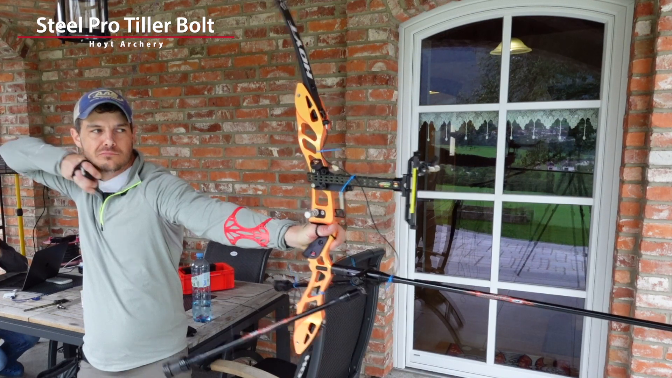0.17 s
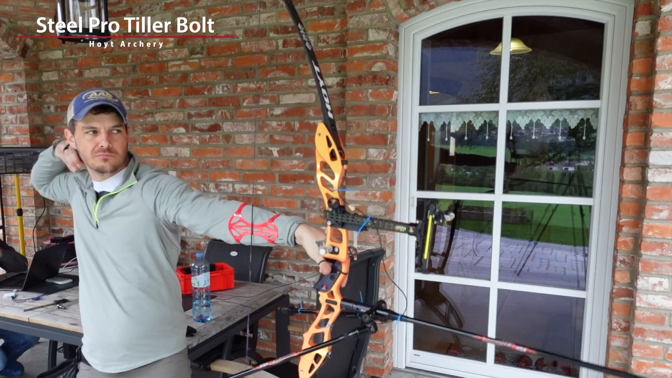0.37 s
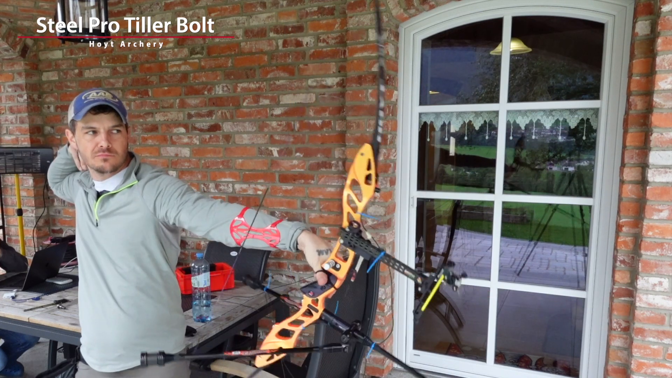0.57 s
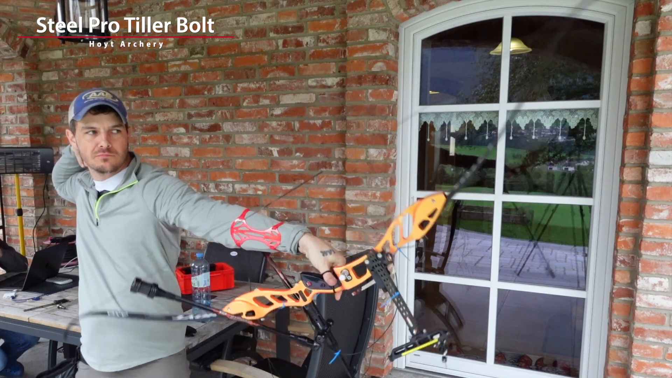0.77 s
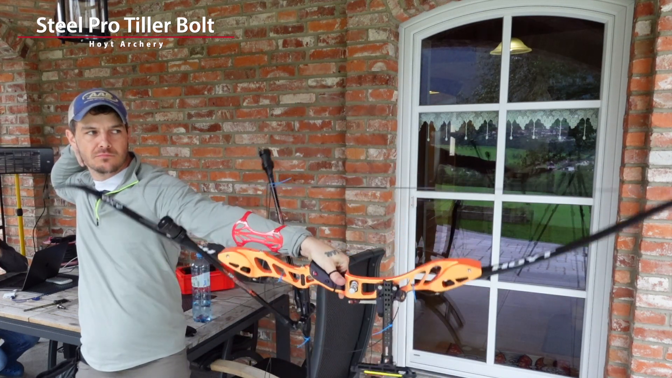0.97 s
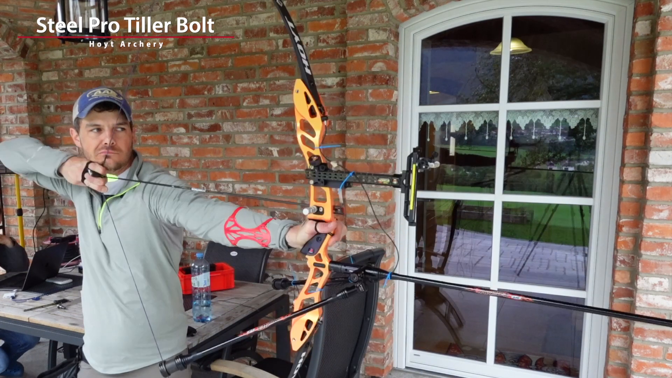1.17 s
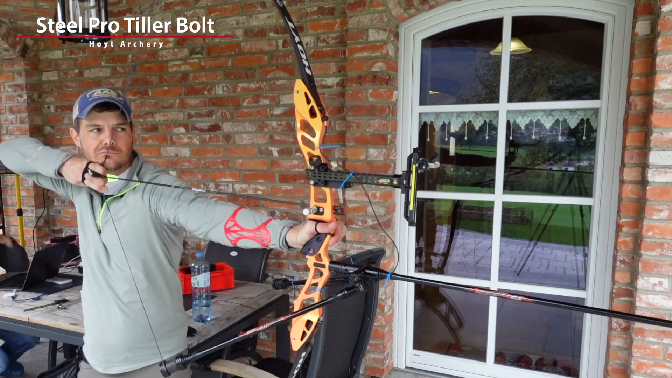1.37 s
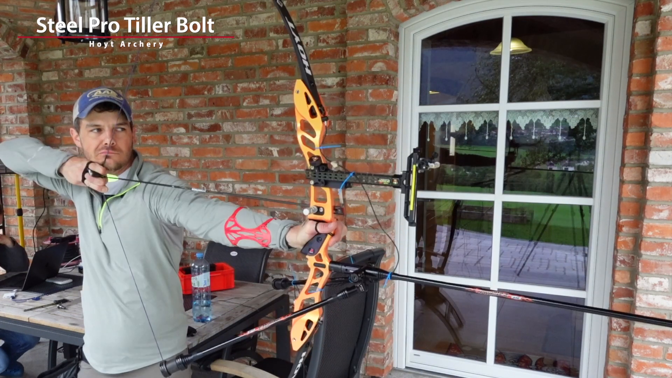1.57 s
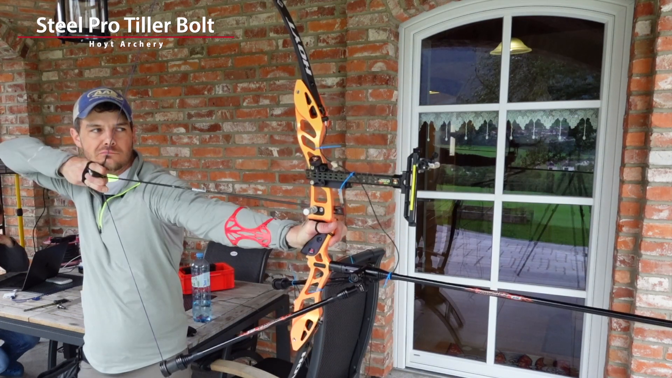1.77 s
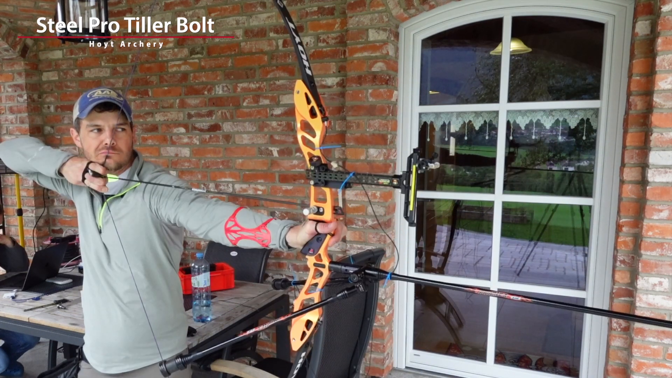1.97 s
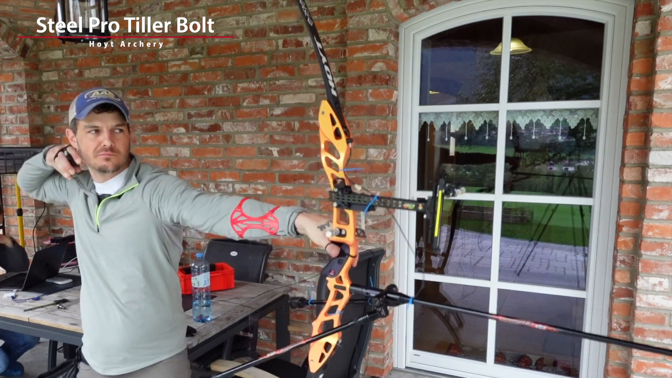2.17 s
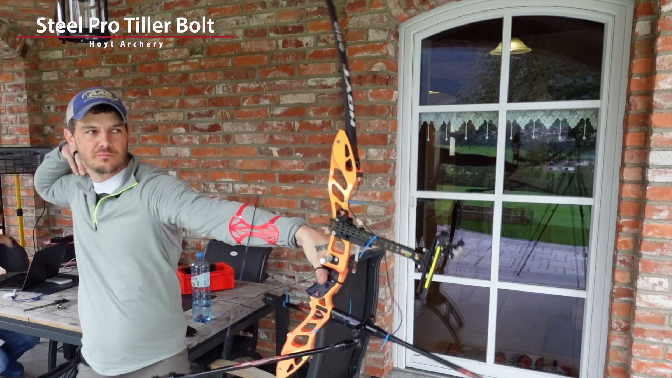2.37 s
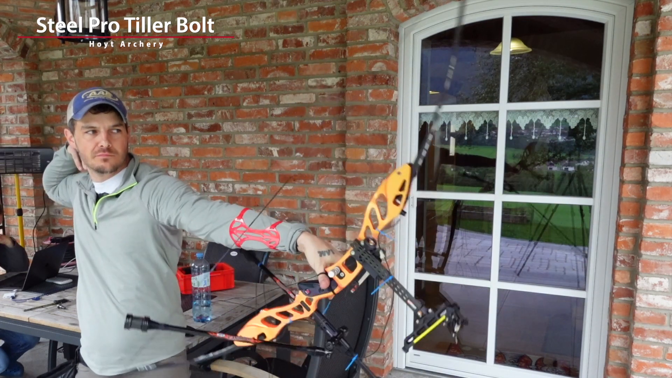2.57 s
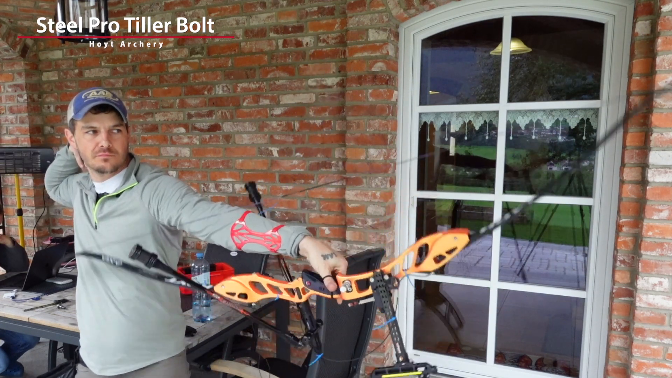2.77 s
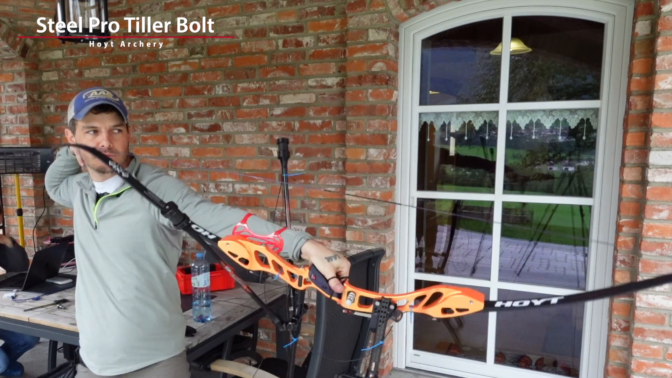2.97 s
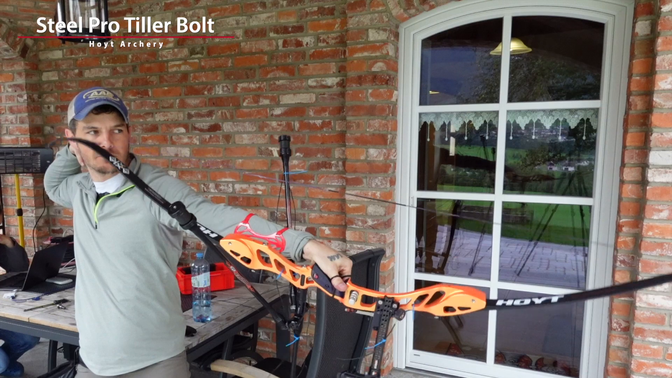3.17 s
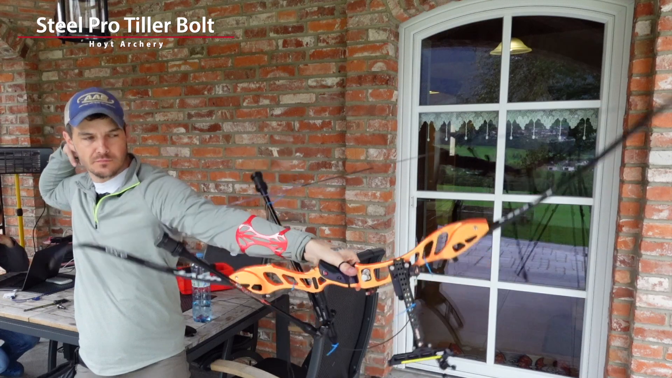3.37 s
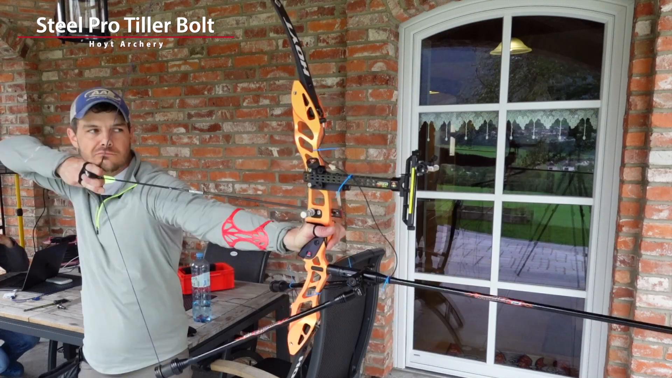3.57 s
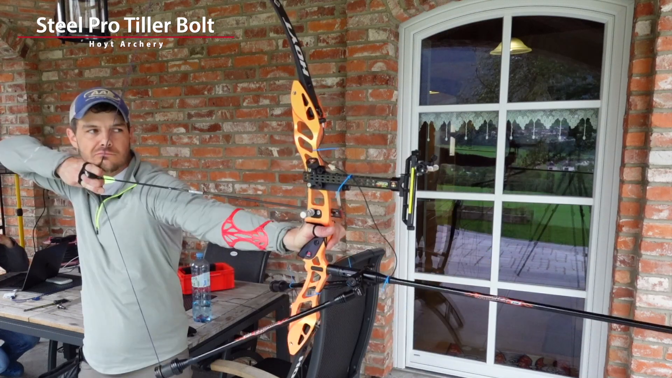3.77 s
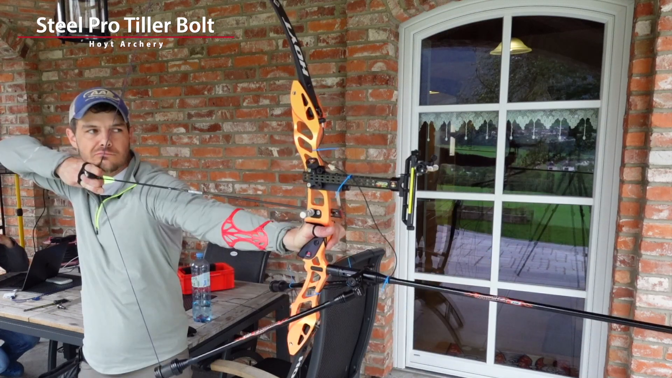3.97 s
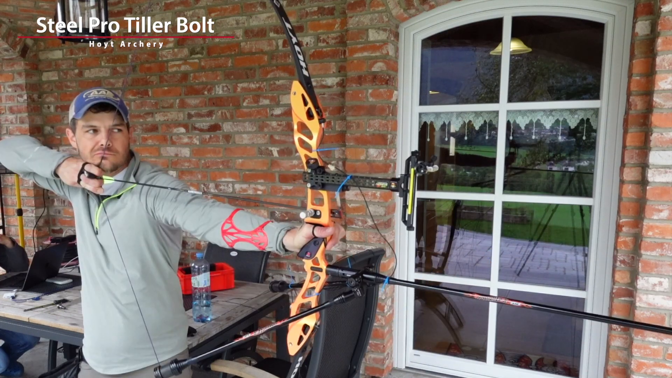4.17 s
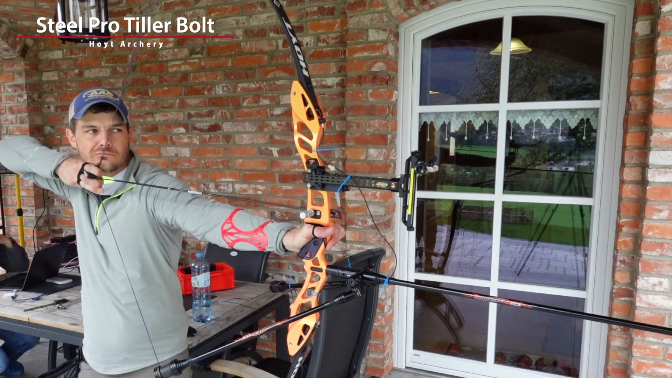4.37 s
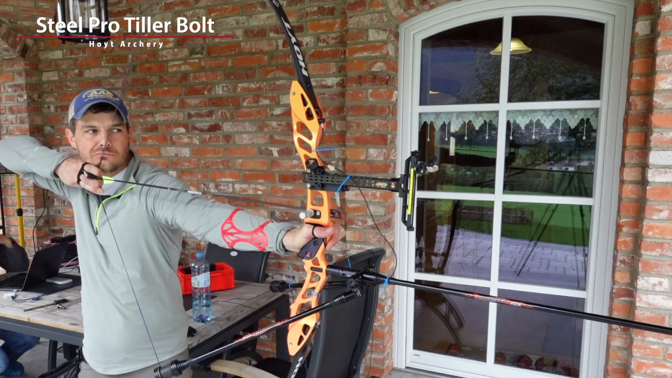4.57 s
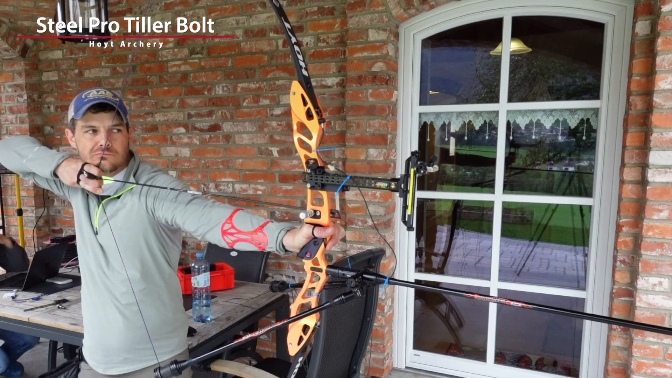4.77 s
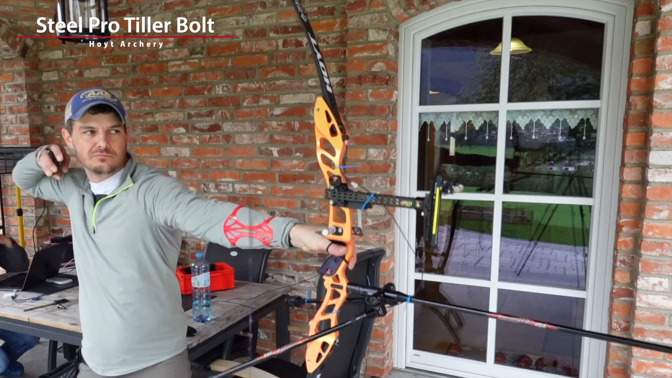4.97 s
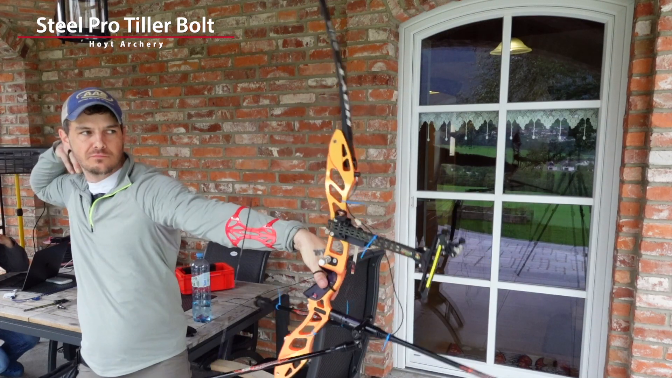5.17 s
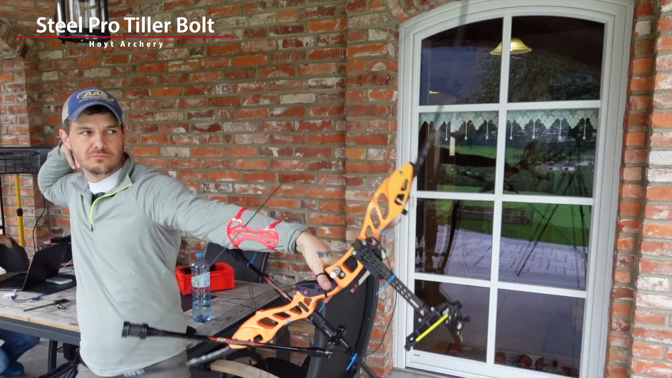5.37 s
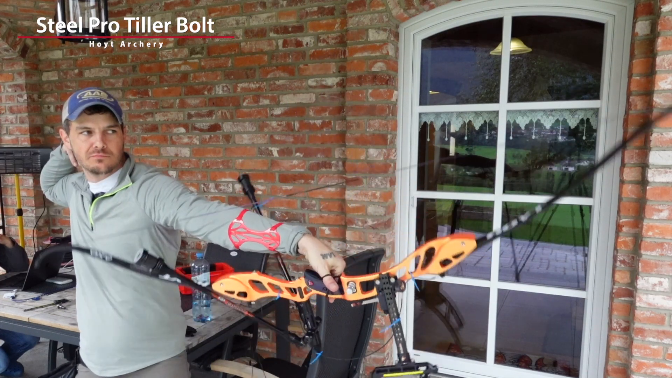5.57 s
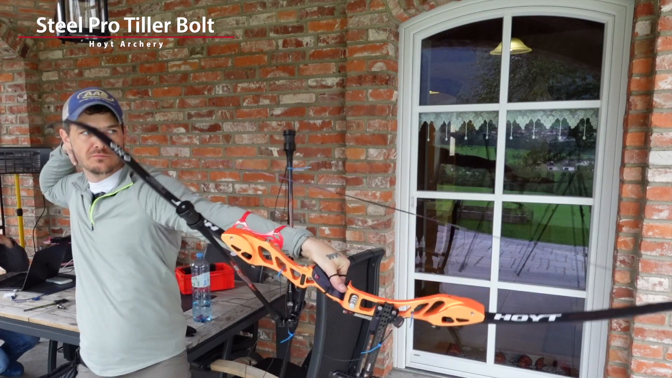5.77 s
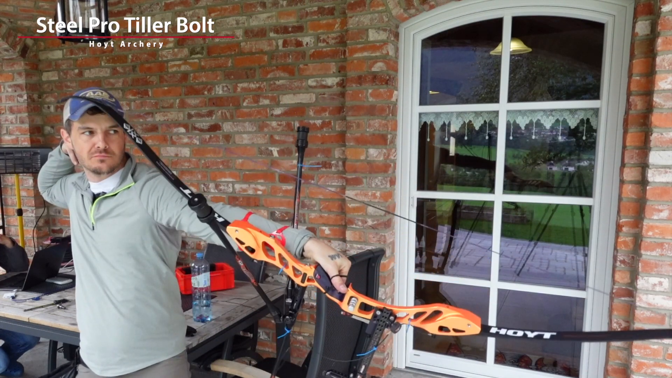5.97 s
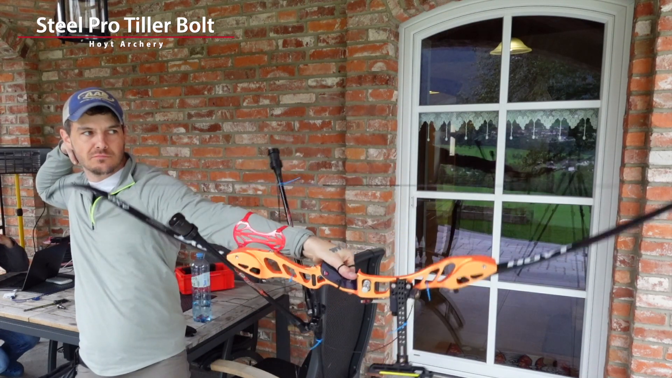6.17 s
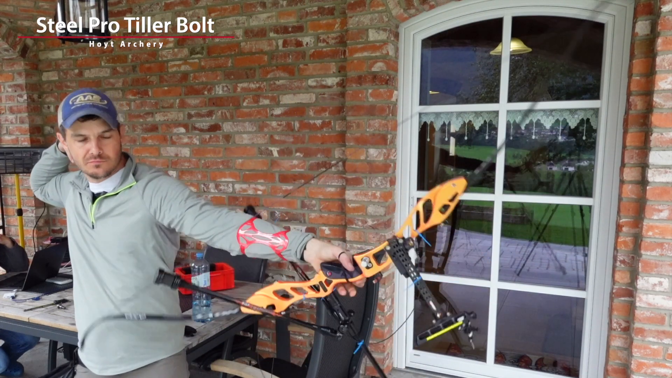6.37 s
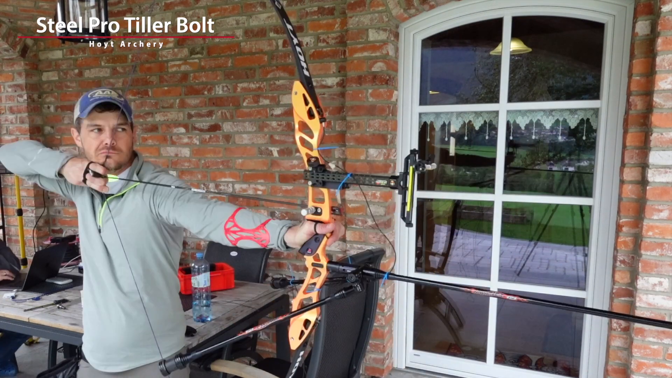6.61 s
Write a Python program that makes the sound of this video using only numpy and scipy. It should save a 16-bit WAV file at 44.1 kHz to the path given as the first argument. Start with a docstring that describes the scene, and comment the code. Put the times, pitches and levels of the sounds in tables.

```python
"""A sharp click, then the zip, slap and twang of a recurve bow and a far thud: three shots on a porch.
Each time the clicker snaps off the arrow point, the string slips from the fingers, the arrow zips past
its rest, string and limbs slam to a stop and ring, and the arrow hits a target some way off.
Fittings tick as the bow swings. Brick walls throw the sound back; under it lie outdoor air and,
after the first shot, a light breeze that dies away."""
import sys
import numpy as np
from scipy import signal
from scipy.fft import rfft, irfft
from scipy.io import wavfile
from scipy.ndimage import uniform_filter1d

SR = 44100
rng = np.random.default_rng(int(sys.argv[2]) if len(sys.argv) > 2 else 0)


def waveform_to_disk(signal):
    """Save audio, clipped to [-1, 1], as 16-bit WAV at the path in sys.argv[1]."""
    frames = np.transpose(np.atleast_2d(signal))
    scaled = np.clip(frames, -1, 1) * 32767
    samples = np.round(scaled).astype(np.int16)
    wavfile.write(sys.argv[1], SR, samples)


N = 292824
T = np.arange(int(.8 * SR)) / SR   # seconds within one event

# The shots. Each row: when the string stops in seconds, bow level in dB, finger slip in dB,
# arrow zip in dB, flight time in seconds, target thud in dB, buzz of the fittings in dB.
SHOTS = [(0.2062, -1, -23.5, 0, 0.18, -0.5, -74), (2.0847, 0, -17.5, -2.5, 0.18, 0.5, -52.5),
         (4.9017, 0, -13, -3.5, 0.194, -3, -50.5)]
# Modes of string and limbs; the loudest is the string's swing.
# Each row: frequency in Hz, level in dB, time to fall 60 dB (t60) in seconds.
BOW_MODES = [(83, -23, 0.25), (116.5, -28.5, 0.65), (143.4, -27, 0.4), (197.4, -8, 0.36),
             (223.8, -13.5, 0.3), (233.3, -20, 0.57), (270, -26.5, .3), (392, -16, 0.35),
             (472.3, -24, 0.56), (512, -17, 0.34), (568, -22, 0.44), (890, -18, 0.21), (916, -27, 0.52),
             (956, -26, .27), (1367, -31.5, 0.31)]


def from_db(db):
    """Decibels to gain."""
    return 10 ** (np.asarray(db) / 20)


def rms_one(x):
    """Scale to unit power."""
    return x / np.sqrt(np.mean(x ** 2) + 1e-20)


def at_hz(points, hz):
    """Read a curve on a log-frequency axis."""
    f, value = np.transpose(points)
    return np.interp(np.log(np.maximum(hz, 1)), np.log(f), value)


def fade(t60):
    """Exponential decay that falls 60 dB in t60 seconds."""
    return np.exp(-np.log(1000) * T / t60)


def hold_and_fall(hold_s, early_t60, late_db, late_t60):
    """A level that holds for a moment, then falls quickly into a slow faint tail."""
    return from_db(-60 * np.maximum(T - hold_s, 0) / early_t60) + from_db(late_db) * fade(late_t60)


def add(out, s, sound):
    """Mix a sound in at s seconds."""
    at = max(round(s * SR), 0)
    out[at:at + len(sound)] += sound[:N - at]


def through(x, response):
    """Causal convolution that keeps the length."""
    return signal.fftconvolve(x, response)[:len(x)]


def colour(x, spectrum, size=16384):
    """Minimum-phase EQ through (Hz, dB) points: nothing sounds ahead of the attack."""
    gain = from_db(at_hz(spectrum, np.fft.rfftfreq(size, 1 / SR)))
    cepstrum = irfft(np.log(gain))
    cepstrum[1:size // 2] *= 2
    cepstrum[size // 2 + 1:] = 0
    return through(x, irfft(np.exp(rfft(cepstrum))))


def ring(modes):
    """Decaying sines of a struck body."""
    return sum(from_db(db) * fade(t60) * np.sin(2 * np.pi * hz * T) for hz, db, t60 in modes)


def contacts(per_s, spread_db):
    """Random tiny impacts of uneven size, at unit power."""
    sizes = from_db(spread_db * np.clip(rng.standard_normal(len(T)), -2, 2))
    signs = rng.choice([-1, 1], len(T))
    hits = rng.random(len(T)) < per_s / SR
    return rms_one(sizes * signs * hits)


def porch_tail(build_s=0.0046):
    """Diffuse reflections that build up and die soonest in the high treble; unit energy."""
    # Porch reverb. Each row: band centre in Hz, t60 in seconds.
    decays = [(100, 0.428), (400, 0.18), (1000, 0.33), (2500, 0.31), (5000, 0.28), (9000, 0.19),
              (15000, 0.097)]
    white = rfft(rng.standard_normal(len(T)))
    hz = np.fft.rfftfreq(len(T), 1 / SR)
    centres, t60s = np.transpose(decays)
    tail = np.zeros(len(T))
    for share, t60 in zip(np.eye(len(centres)), t60s):
        band = at_hz(list(zip(centres, share)), hz)
        tail += irfft(white * band, len(T)) * fade(t60)
    tail *= 1 - np.exp(-(T / build_s) ** 2)
    return tail / np.linalg.norm(tail)


def porch(x, direct_db, echo_db, tail_db, echo_s=.01085):
    """Direct sound, one hard slapback off the brick wall and a fresh diffuse tail for each source."""
    echo = np.interp(np.arange(N) - round(echo_s * SR), np.arange(N), x, left=0)
    return from_db(direct_db) * x + from_db(echo_db) * echo + from_db(tail_db) * through(x, porch_tail())


def outdoor_air():
    """A bed of low outdoor noise and hiss whose level and brightness change in steps."""
    # The steps. Each row: start in seconds, level in dB, hiss relative to that level in dB.
    steps = [(0, -49, -14), (1.204, -57, -40), (3.534, -53.5, -11)]
    # Tone of the air. Each row: frequency in Hz, gain in dB.
    air_eq = [(15, -31.5), (25, 0), (59, -9), (102, -6), (130, -6), (242, -10), (293, -10.5), (439, -10.5),
              (489, -10), (607, -10.5), (1610, -17), (7110, -23), (14000, -41), (16000, -41)]
    hiss_eq = [(1000, -30.5), (4000, 3), (7000, 7.0), (12000, -12.0)]
    starts, level_db, hiss_db = np.transpose(steps)
    step = np.maximum(np.searchsorted(starts, np.arange(N) / SR, "right") - 1, 0)
    air = rms_one(colour(rng.standard_normal(N), air_eq))
    hiss = rms_one(colour(rng.standard_normal(N), hiss_eq))
    return from_db(level_db[step]) * (air + from_db(hiss_db[step]) * hiss)


def clicker(crack_db=-4.5, crack_t60=0.017):
    """A steel blade chatters against the riser; its brief ring is heard mostly off the walls."""
    # Blade strikes. Each row: start in seconds, level in dB.
    strikes = [(0.031, -2), (1.9120, -2.5), (4.7298, -2.5)]
    # Ring of the blade. Each row: frequency in Hz, level in dB, t60 in seconds.
    blade_modes = [(1620, -35.5, .022), (1688, -24, 0.058), (2420, -36.5, 0.013), (3130, -34, .015),
                   (3920, -26.5, 0.02), (5070, -29, .025), (5010, -25.5, .045), (5600, -30, 0.017),
                   (7800, -28.5, 0.015), (10200, -31, .02)]
    # Tone of the crack. Each row: frequency in Hz, gain in dB.
    crack_eq = [(200, -27.5), (500, -21), (900, -23), (1500, -9), (3000, -9.5), (5000, -3.5), (8000, -8.5),
                (10000, -1.5), (11000, -10.5), (13500, -2.5), (16000, -9.5)]
    crack, blade = np.zeros((2, N))
    for s, db in strikes:
        chatter = contacts(per_s=30000, spread_db=0.94) * fade(crack_t60)
        add(crack, s, from_db(db + crack_db) * colour(chatter, crack_eq))
        add(blade, s, from_db(db) * ring(blade_modes))
    return (porch(crack, direct_db=-1.5, echo_db=-5.0, tail_db=0.5)
            + porch(blade, direct_db=-14.0, echo_db=-4.5, tail_db=-1.0))


def string_release(slip_lead_s=0.014, zip_lead_s=.0098, slip_rise_s=.002):
    """The string scrapes off the finger tab and drives the arrow out."""
    # Tone of the scrape. Each row: frequency in Hz, gain in dB.
    slip_eq = [(100, -9.5), (500, -0.5), (2000, -1.5), (5500, 3), (9000, -1.5), (15000, -10.5)]
    out = np.zeros(N)
    envelope = fade(t60=0.051) * (1 - np.exp(-(T / slip_rise_s) ** 2))
    for s, _, slip_db, zip_db, *_ in SHOTS:
        scrape = contacts(per_s=12000, spread_db=3) * envelope
        add(out, s - slip_lead_s, from_db(slip_db) * colour(scrape, slip_eq))
        add(out, s - zip_lead_s, from_db(zip_db) * arrow_zip())
    return out


def arrow_zip(start_hz=1900, end_hz=4900, stroke_s=.0085, rise_db=26.0, rough=.28, leave_s=0.002):
    """The shaft rubs unevenly over its rest, rising in pitch and level as it gathers speed."""
    travel = np.minimum(T / stroke_s, 1)
    wobble, grip = rms_one(uniform_filter1d(rng.standard_normal((2, len(T))), size=14))
    hz = (start_hz + (end_hz - start_hz) * travel ** 1.5) * (1 + .5 * rough * wobble)
    leaving = np.exp(-(np.maximum(T - stroke_s, 0) / leave_s) ** 2)
    envelope = from_db(rise_db * (travel - 1)) * leaving * (1 + rough * grip)
    return envelope * np.sin(2 * np.pi * np.cumsum(hz) / SR)


def twang(kick_db=-5.0, kick_hz=215, kick_t60=.04, kick_rise_s=0.0019, swell_s=.009, lead_s=.001):
    """The string jerks taut with a low kick while the modes of string and limbs swell and ring."""
    out = np.zeros(N)
    kick = ring([(kick_hz, kick_db, kick_t60)]) * (1 - np.exp(-T / kick_rise_s))
    body = ring(BOW_MODES) * (1 - np.exp(-T / swell_s))
    for s, db, *_ in SHOTS:
        add(out, s - lead_s, from_db(db) * (kick + body))
    return out


def limb_slap(throb=0.46, slap_lag_s=.0075, slap_t60=.025, rattle_db=-7.5):
    """The string slaps the limbs hard on its first rebound, then more lightly on every swing."""
    # Tone of string on limb. Each row: frequency in Hz, gain in dB.
    slap_eq = [(400, -33), (900, -15), (1500, -10), (3000, -8.5), (4300, -8.5), (5600, -6), (7000, -11.5),
               (8500, -8.5), (10500, -15.5), (13000, -14), (16000, -21.5)]
    out = np.zeros(N)
    string_hz = max(BOW_MODES, key=lambda mode: mode[1])[0]
    swing = 1 + throb * np.cos(2 * np.pi * string_hz * (T - .003))
    force = swing * hold_and_fall(hold_s=0.034, early_t60=0.15, late_db=-39.0, late_t60=0.418)
    for s, db, *_ in SHOTS:
        rattle = contacts(per_s=2000, spread_db=4) * force
        slap = contacts(per_s=8000, spread_db=2.7) * fade(slap_t60)
        add(out, s, from_db(db + rattle_db) * colour(rattle, slap_eq))
        add(out, s + slap_lag_s, from_db(db) * colour(slap, slap_eq))
    return out


def frame_shudder():
    """The dense low modes of frame and stabilisers blur into one noisy shake, alike on every shot."""
    # Tone of the frame. Each row: frequency in Hz, gain in dB.
    frame_eq = [(30, -36.5), (55, -15), (85, -5), (170, -3), (300, -2.5), (550, -1), (750, -4.5),
                (1000, -5), (1400, -8.5), (2400, -10), (3500, -24.5)]
    out = np.zeros(N)
    envelope = hold_and_fall(hold_s=0.028, early_t60=0.3, late_db=-29.0, late_t60=0.81)
    shake = colour(contacts(per_s=9000, spread_db=0.59) * envelope, frame_eq)
    for s, db, *_ in SHOTS:
        add(out, s, from_db(db) * shake)
    return out


def target_thud(rise_s=0.016):
    """The far thud of the arrow, dulled and smeared by echoes of the yard."""
    # Tone of the thud. Each row: frequency in Hz, gain in dB.
    thud_eq = [(25, -19), (50, -12), (100, -13.5), (160, -8), (300, -19.5), (440, -11.5), (620, -25),
               (850, -20), (1300, -26.5), (2500, -35), (4000, -41.5), (8000, -44.5), (14000, -69)]
    out = np.zeros(N)
    envelope = hold_and_fall(hold_s=0.038, early_t60=0.21, late_db=-14.0, late_t60=0.97)
    envelope *= 1 - np.exp(-T / rise_s)
    for s, *_, flight_s, target_db, _ in SHOTS:
        impact = contacts(per_s=3000, spread_db=1.8) * envelope
        add(out, s + flight_s, from_db(target_db) * colour(impact, thud_eq))
    return out


def fittings(buzz_lag_s=.245, buzz_t60=0.29, tick_t60=0.018):
    """Loose metal parts buzz faintly after each shot and tick as the bow swings in its sling."""
    # Ring of the small parts. Each row: frequency in Hz, level in dB, t60 in seconds.
    metal_modes = [(5950, -6, 0.018), (6200, 1.5, 0.026), (8200, -3, .015), (9500, -2, .008),
                   (12800, -5, .008)]
    # Ticks after the second shot. Each row: start in seconds, level in dB, treble lift in dB.
    ticks = [(2.195, -23, 8), (2.201, -25, 13), (2.5945, -47, 2), (2.6058, -40, 5), (2.6128, -30.5, -1.5),
             (2.6817, -48, 5), (2.75, -46.5, 3), (2.7575, -44, 3), (2.7846, -46.5, -1), (2.9329, -38, -4),
             (3.1274, -60, 1.5)]
    # Tone of a tick. Each row: frequency in Hz, gain in dB.
    tick_eq = [(500, -9), (2000, -10), (3300, -9), (4250, 2.5), (4800, 0), (5500, -2), (8000, -4),
               (10000, -10.5), (15000, -19)]
    out = np.zeros(N)
    for s, *_, buzz_db in SHOTS:
        jingle = rms_one(through(contacts(per_s=1500, spread_db=3.5), ring(metal_modes)))
        add(out, s + buzz_lag_s, from_db(buzz_db) * jingle * fade(buzz_t60))
    for s, db, lift_db in ticks:
        tick = colour(contacts(per_s=12000, spread_db=1.5) * fade(tick_t60), tick_eq)
        add(out, s, from_db(db) * colour(tick, [(5000, 0), (12000, lift_db)]))
    return out


def breeze(start_s=1.204, start_db=-34, wane_db_per_s=5, lull_s=3.95, lull_db_per_s=68, calm_db=-67.5):
    """Wind rumbles softly on the microphone, waning between brief gusts, then dropping to near calm."""
    # Bell-shaped gusts. Each row: time of the peak in seconds, lift in dB.
    gusts = [(1.47, 12), (1.81, 4), (2.49, 4.5)]
    # Tone of the rumble. Each row: frequency in Hz, gain in dB.
    rumble_eq = [(8, -4), (14, 1), (28, -8.5), (50, -22), (100, -39), (250, -67), (1000, -110)]
    swell_s = .045   # width of a gust, and length of the fade-in
    t = np.arange(N) / SR
    level_db = start_db - wane_db_per_s * (t - start_s) - lull_db_per_s * np.maximum(t - lull_s, 0)
    lift_db = sum(db * np.exp(-((t - s) / swell_s) ** 2) for s, db in gusts)
    fade_in = np.clip((t - start_s) / swell_s, 0, 1)
    strength = (from_db(level_db + lift_db) + from_db(calm_db)) * fade_in
    return strength * rms_one(colour(rng.standard_normal(N), rumble_eq))


def scene():
    """The mono mix: the bright sounds bounce around the porch, the low ones and the air go in dry."""
    release = porch(string_release(), direct_db=0.5, echo_db=-10.5, tail_db=-6.5)
    slap = porch(limb_slap(), direct_db=2.5, echo_db=-10.5, tail_db=0.0)
    ticks = porch(fittings(), direct_db=1.5, echo_db=-14.0, tail_db=-2.0)
    bow = clicker() + release + slap + ticks + frame_shudder() + twang()
    return (bow + target_thud() + outdoor_air() + breeze())[None]


def record(dry, ceiling=.9, cutoff_hz=15800):
    """The loudest peaks clip, and a steep low-pass takes off the very top."""
    low_pass = signal.ellip(10, .1, 70, cutoff_hz, fs=SR, output="sos")
    return signal.sosfilt(low_pass, np.clip(dry, -ceiling, ceiling))


dry = scene()
out = record(dry)
waveform_to_disk(out)
```